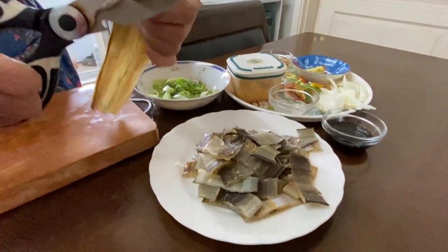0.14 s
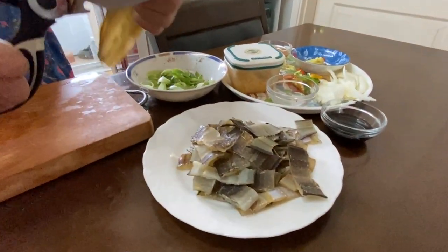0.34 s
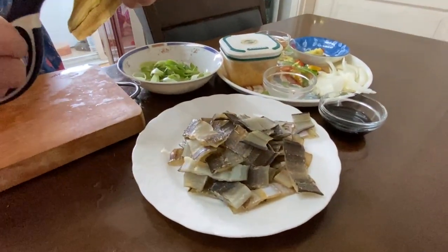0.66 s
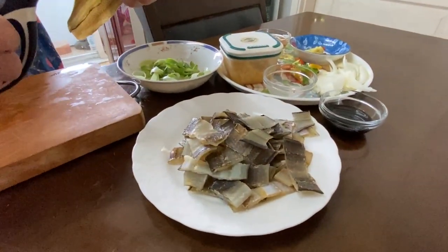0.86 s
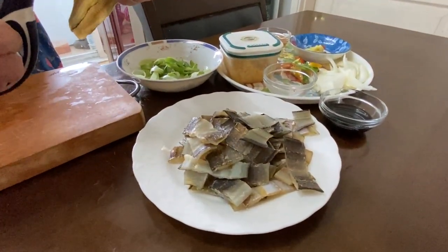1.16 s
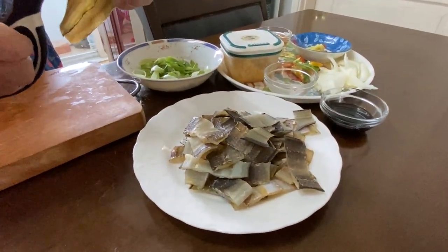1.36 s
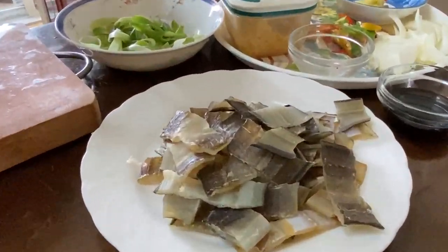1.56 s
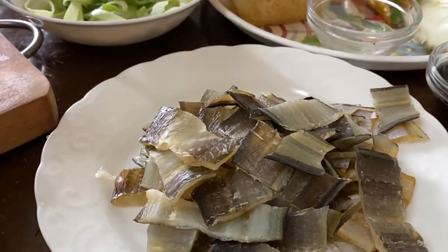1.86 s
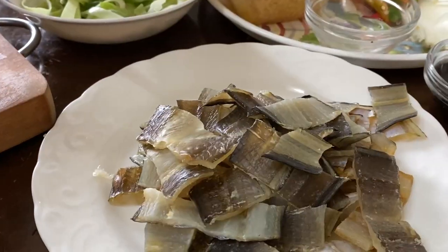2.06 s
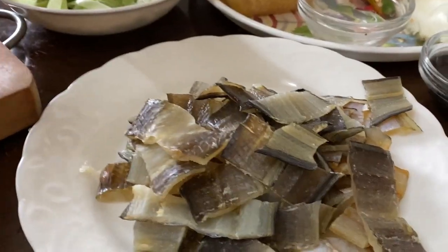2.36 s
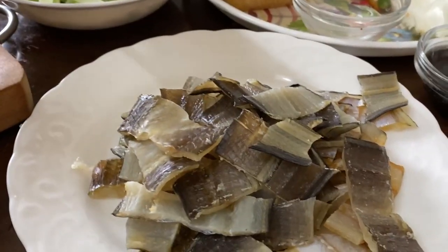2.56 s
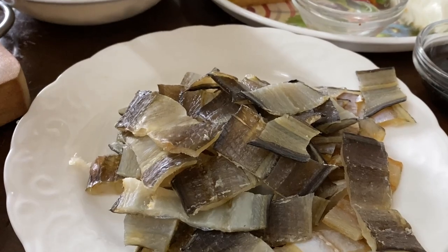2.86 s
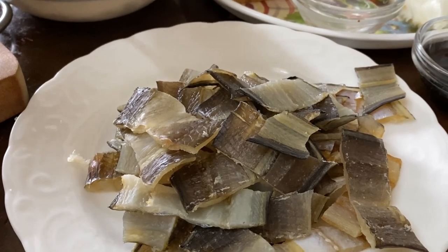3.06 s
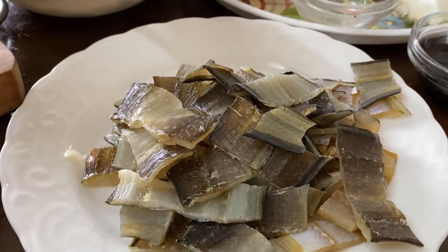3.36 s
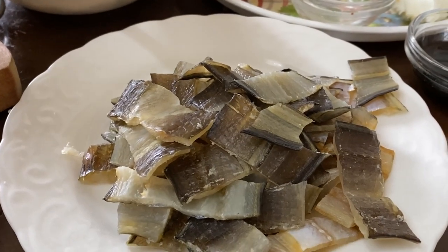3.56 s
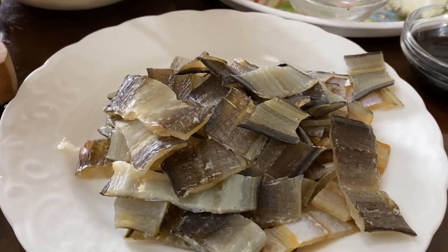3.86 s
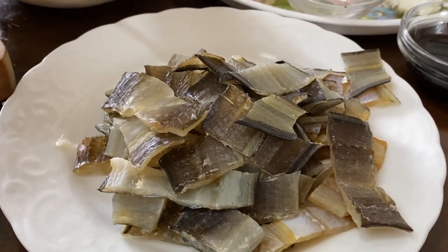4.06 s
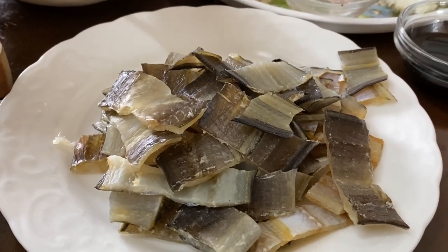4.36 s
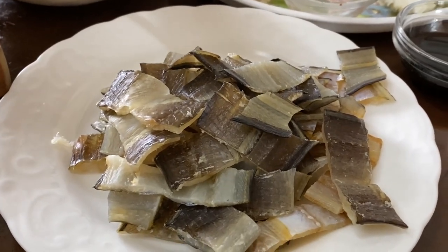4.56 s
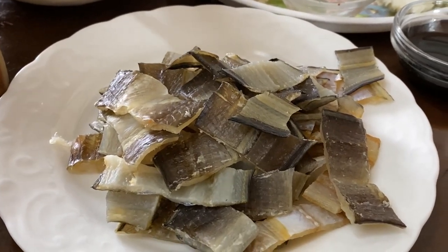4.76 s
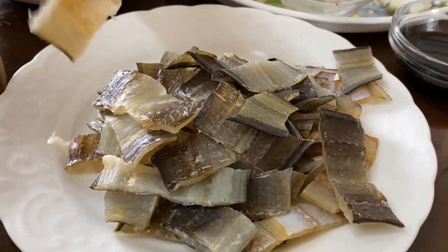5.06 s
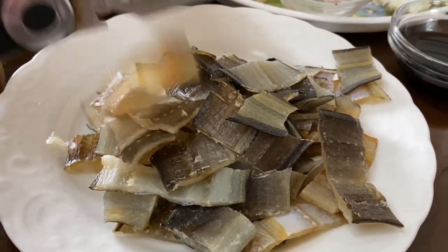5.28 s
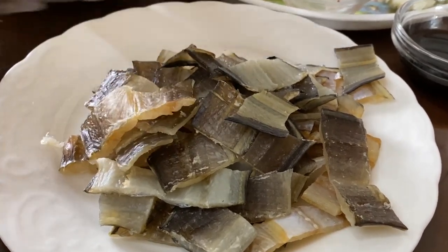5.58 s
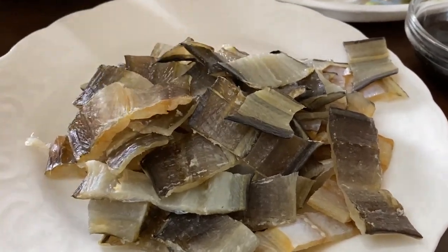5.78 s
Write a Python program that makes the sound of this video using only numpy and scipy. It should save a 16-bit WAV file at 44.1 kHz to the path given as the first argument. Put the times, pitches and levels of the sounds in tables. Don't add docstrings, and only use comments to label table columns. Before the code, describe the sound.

After dull handling bumps, scissor blades tick, squeal and crunch through stiff dried fish, woody board knocks ringing briefly in a hard-walled kitchen.

```python
import sys
import numpy as np
from scipy import signal
from scipy.fft import rfft, irfft
from scipy.io import wavfile

SR = 44100
rng = np.random.default_rng(int(sys.argv[2]) if len(sys.argv) > 2 else 0)


def dump(signal):
    limited = np.clip(np.atleast_2d(signal).T, -1, 1)
    pcm = np.round(limited * 32767).astype(np.int16)
    wavfile.write(sys.argv[1], SR, pcm)


def level_to_linear(level):
    exponent = np.asarray(level, float) / 20
    return 10 ** exponent


N = 261365
TIME = np.arange(N) / SR
STEEL_EDGES_HZ = (1500, 4000, 10000, 16200)
# mode_hz, level_db, t60_s
BOARD_MODES = [(708, -8.5, 0.093), (839, 4, 0.024), (973, 11, 0.025), (1059, 9.5, 0.026),
               (1132, -8.5, 0.056), (1260, -63.5, 0.016), (1630, -39, 0.048)]


def rms_one(x):
    return x / np.sqrt(np.mean(x ** 2) + 1e-20)


def top_one(x):
    return x / (np.max(np.abs(x), axis=-1, keepdims=True) + 1e-12)


def at_hz(points, hz):
    points_hz, points_db = np.transpose(points)
    return np.interp(np.log(hz), np.log(points_hz), points_db)


def band(x, low_hz, high_hz, order=2):
    edges_hz = [low_hz, min(high_hz, 0.45 * SR)]
    return signal.sosfilt(signal.butter(order, edges_hz, "band", fs=SR, output="sos"), x)


def coloured(points, size=N):
    hz = np.maximum(np.arange(size // 2 + 1) * SR / size, 1)
    spectrum = rfft(rng.standard_normal(size)) * level_to_linear(at_hz(points, hz))
    return rms_one(irfft(spectrum, size))


def ring(x, hz, t60_s):
    r = level_to_linear(-60 / (t60_s * SR))
    w = 2 * np.pi * hz / SR
    return signal.lfilter([0, np.sin(w)], [1, -2 * r * np.cos(w), r * r], x)


def add(track, start_s, piece):
    at = round(start_s * SR)
    track[at:at + len(piece)] += piece[:N - at]


def stroke(points_s, points_db):
    first_s, last_s = points_s[0], points_s[-1]
    gate = np.interp(TIME, [first_s - 0.02, first_s, last_s, last_s + 0.02], [0, 1, 1, 0])
    return gate * level_to_linear(np.interp(TIME, points_s, points_db))


def background():
    # freq_hz, density_db
    air = [(53, -13.5), (90, -16.5), (125, -7), (272, -9), (323, -9), (510, -20), (568, -16), (633, -23.5),
           (690, -19), (896, -13.5), (1140, -23), (2090, -37), (5300, -44.5), (12100, -57), (16000, -68)]
    # centre_hz, width_hz, level_db
    whirr = [(329, 2.9, -65), (401.3, 21, -66.5)]
    # tone_hz, level_db
    tones = [(570.8, -64.5), (694.4, -69)]
    out = level_to_linear(-57) * coloured([(60, -60), *air])
    for hz, width_hz, db in whirr:
        t60_s = np.log(1000) / np.pi / width_hz
        out += level_to_linear(db) * rms_one(ring(rng.standard_normal(N), hz, t60_s))
    for hz, db in tones:
        unsteady = rms_one(ring(rng.standard_normal(N), hz, 0.99))
        out += level_to_linear(db) * (np.sin(2 * np.pi * hz * TIME) + 0.22 * unsteady)
    return out


def rumble():
    # freq_hz, density_db
    sway = [(3, -14.5), (9, 5), (25, 0), (45, -25.5), (100, -73), (400, -150)]
    # freq_hz, density_db
    tremor = [(15, -31.5), (32, -3), (75, -11), (100, -38.5), (300, -75.5), (800, -150)]
    # time_s, tremor_db
    grip = [(0, -49), (.2, -56), (.45, -40.5), (.8, -49.5), (1.2, -55.5), (1.6, -44), (2.5, -40.5),
            (3.3, -38.5), (4.3, -48.5), (5.4, -47), (5.93, -49.5)]
    tremor_db = np.interp(TIME, *np.transpose(grip))
    return level_to_linear(tremor_db + 7) * coloured(sway) + level_to_linear(tremor_db) * coloured(tremor)


def jolts():
    # centre_s, level_db, contact_s, mount_hz
    pushes = [(0.071, -23, 0.076, 9), (0.258, -11, 0.017, 15.4), (.5, -10.5, 0.011, 40),
              (0.719, -12, 0.017, 19.5), (0.975, -18.5, 0.016, 33), (1.008, -16, 0.051, 26.7),
              (1.309, -12, 0.019, 16.4), (2.244, -2, 0.019, 5.23), (4.738, -21.5, 0.019, 18.4),
              (5.236, -18, 0.021, 34), (5.536, -18, 0.017, 78)]
    # centre_s, level_db, contact_s, mount_hz
    pulls = [
        (0.463, -9.5, 0.022, 2.6),
        (.491, -13.5, 0.01, 26),
        (.698, -4.5, 0.019, 4.8),
        (1.797, -13.5, 0.02, 21),
        (2.48, -10, 0.028, 16),
        (3.47, -18.5, 0.013, 16),
        (4.591, -17, 0.025, 12),
    ]
    out, t = np.zeros(N), TIME[:SR // 2]
    for rows, sign, damping in ((pushes, 1, 0.21), (pulls, -1, 0.69)):
        for centre_s, db, contact_s, mount_hz in rows:
            push = sign * level_to_linear(db) * np.sin(np.pi * np.clip(t / contact_s, 0, 1)) ** 2
            w = 2 * np.pi * mount_hz
            b, a = signal.bilinear([1, w * damping, 0], [1, 2 * w * damping, w * w], SR)
            add(out, centre_s - contact_s / 2, signal.lfilter(b, a, push))
    return out


def thuds():
    # start_s, level_db, t60_s
    hits = [(0.256, -30, 0.091), (0.45, -32.5, 0.11), (0.487, -30, 0.13), (0.501, -38, 0.13),
            (0.689, -25, 0.058), (0.968, -35.5, 0.19), (0.993, -33, 0.1), (1.305, -28.5, 0.06),
            (1.821, -36.5, 0.15), (2.238, -34, 0.24), (2.28, -42, 0.1), (2.437, -33.5, 0.041),
            (2.701, -38, 0.26), (3.447, -31.5, 0.14), (4.574, -37.5, 0.056), (4.717, -35, 0.061),
            (5.532, -42, 0.11)]
    low_hz, upper_hz, upper_db = 180, 306.2, -6.5
    contact_s, detune = 0.00093, 0.061
    out, t = np.zeros(N), TIME[:SR // 4]
    touch = np.sin(np.pi * np.clip(t / contact_s, 0, 1))
    for start_s, db, t60_s in hits:
        low_draw, upper_draw = rng.standard_normal(2)
        low = top_one(ring(touch, low_hz * (1 + detune * low_draw), t60_s))
        upper = top_one(ring(touch, upper_hz * (1 + detune * upper_draw), t60_s))
        add(out, start_s, level_to_linear(db) * (low + level_to_linear(upper_db) * upper))
    return out


def kitchen(x):
    # freq_hz, t60_s
    room_t60 = [(200, 0.4), (530, 0.25), (1390, 0.46), (3000, 0.53), (5000, 0.36), (7000, .32),
                (10000, 0.1), (14000, 0.24)]
    # freq_hz, level_db
    room_colour = [(200, 13), (500, 16), (1000, 11), (1600, 9.5), (3000, -1.5), (4800, 3.5), (7000, 5),
                   (14000, 4.5)]
    t, tail = TIME[:SR * 3 // 4], 0
    for hz in 177 * 2 ** np.arange(0, 6.7, 1 / 3):
        noise = band(rng.standard_normal(len(t)), hz / 2 ** 0.27, hz * 2 ** 0.24)
        tail = tail + noise * level_to_linear(at_hz(room_colour, hz) - 60 * t / at_hz(room_t60, hz))
    tail *= np.clip((t - 0.002) / 0.0016, 0, 1)
    return signal.fftconvolve(x, tail / np.sqrt(np.sum(tail ** 2)))[:N]


def chatter():
    catches = (rng.random(N) < 160 / SR) * rng.exponential(1, N)
    grains = 1 + 0.8 * signal.lfilter([1], [1, -0.992], catches)
    stick_slip = rms_one(band(rng.standard_normal(N), 9.8, 53))
    return rms_one(grains * level_to_linear(0.5 * stick_slip))


def friction_hiss():
    # start_s, hardest_s, end_s, hiss_db
    strokes = [(1.516, 1.645, 1.97, -68.5), (1.904, 2.03, 2.5, -73), (2.71, 2.726, 2.93, -66),
               (2.78, 2.864, 3.1, -74.5), (3.538, 3.637, 3.84, -59), (4.02, 4.13, 4.46, -71),
               (4.602, 4.64, 4.62, -67.5), (4.69, 4.742, 4.98, -58.5), (4.775, 4.87, 4.89, -78),
               (5.18, 5.245, 5.36, -53.5), (5.37, 5.39, 5.6, -71.5)]
    # freq_hz, density_db
    colour = [(1200, -20), (2200, 16.5), (3000, 11.5), (4000, 0.5), (5500, 13), (8000, 7), (14500, -4.5),
              (16500, -6)]
    rise_db, fall_db = 16.5, 20.5
    gain = sum(stroke([start_s, hardest_s, end_s], [db - rise_db, db, db - fall_db])
               for start_s, hardest_s, end_s, db in strokes)
    return coloured(colour) * gain


def squeals():
    # start_s, end_s, first_hz, last_hz, level_db
    glides = [(1.546, 1.685, 8600, 10400, -72), (1.922, 2.073, 5040, 7500, -56.5),
              (2.707, 2.771, 5200, 5500, -53.5), (2.793, 2.94, 7140, 8400, -77),
              (3.504, 3.578, 8200, 8700, -72), (3.563, 3.688, 9230, 10400, -55.5),
              (3.64, 3.741, 12000, 12800, -64), (4.017, 4.202, 5200, 9100, -55),
              (4.15, 4.253, 7500, 6884, -70), (4.682, 4.796, 8900, 12360, -55),
              (4.724, 4.882, 13150, 14400, -62.5)]
    peak_share, rise_db, fall_db = 0.74, 13.5, 21.5
    wobble = rng.standard_normal((2, N))
    low_pass = signal.butter(1, 450, fs=SR, output="sos")
    narrow = signal.sosfilt(low_pass, wobble[0] + 1j * wobble[1])
    narrow = narrow / np.sqrt(np.mean(np.abs(narrow) ** 2) / 2)
    out = np.zeros(N)
    for start_s, end_s, first_hz, last_hz, db in glides:
        peak_s = start_s + peak_share * (end_s - start_s)
        gain = stroke([start_s, peak_s, end_s], [db - rise_db, db, db - fall_db])
        on = gain > 0
        hz = np.interp(TIME[on], [start_s, end_s], [first_hz, last_hz])
        carrier = np.exp(2j * np.pi * np.cumsum(hz) / SR)
        out[on] += gain[on] * np.real(narrow[on] * carrier)
    return out


def slides():
    return (friction_hiss() + squeals()) * chatter()


def blade_rings():
    # mode_hz, level_db, t60_s
    modes = [(7140, -8, .23), (6900, -2.5, 0.23), (6800, -6, 0.23), (6700, -11, 0.18)]
    # start_s, ring_db, clack_db, clack_hz
    claps = [
        (3.171, -52, -28.5, 6800),
        (4.179, -89, -40.5, 7430),
        (4.362, -92, -56, 7630),
    ]
    clicks, clacks = np.zeros(N) + 1e-18, np.zeros(N)
    click = 1.0 * (TIME[:SR // 50] == 0)
    for start_s, ring_db, clack_db, hz in claps:
        clicks[round(start_s * SR)] = level_to_linear(ring_db)
        add(clacks, start_s, level_to_linear(clack_db) * top_one(band(click, 0.96 * hz, 1.05 * hz, order=3)))
    rings = sum(level_to_linear(db) * ring(clicks, hz, t60_s) for hz, db, t60_s in modes)
    return rings, clacks


def steel_bands(drive):
    return [top_one(band(drive, low_hz, high_hz, order=3))
            for low_hz, high_hz in zip(STEEL_EDGES_HZ, STEEL_EDGES_HZ[1:])]


def ticks():
    # start_s, peak_db, ring_hz, top_db re peak
    clear = [(0.9924, -44, 5800, -35), (1.661, -41, 10500, -21), (1.927, -42, 4100, -25),
             (1.971, -40, 6100, -4), (1.9782, -31, 5130, -12), (2.019, -25.5, 6830, -28),
             (2.0329, -32, 6800, -21), (2.0506, -32, 7500, -16.5), (2.063, -28.5, 6000, -35),
             (2.282, -46, 3920, -9.5), (2.4218, -45, 5470, -12), (2.735, -40, 5700, -13),
             (2.7453, -42.5, 5300, -2), (2.866, -36.5, 8070, -11), (2.928, -45.5, 5950, -24),
             (3.171, -20, 6600, -20), (3.6316, -35, 10600, -15), (3.6528, -36, 10400, -17),
             (4.0228, -38.5, 5390, -16), (4.062, -40.5, 6620, -19), (4.0923, -34.5, 7710, -10),
             (4.099, -60, 7750, -28), (4.123, -32, 8560, -23), (4.1354, -32.5, 8250, -12),
             (4.1789, -34, 7100, -8), (4.363, -40, 7440, -28), (5.2082, -31.5, 7980, -4.5),
             (5.878, -34, 5326, -20), (3.1717, -30, 2520, -30), (4.6713, -52, 3980, -19)]
    # start_s, peak_db
    pivot = [(0.925, -48), (0.9823, -59), (1.5199, -47.5), (1.552, -50), (1.5674, -49), (1.624, -51),
             (1.701, -60), (2.1902, -48), (2.3213, -48), (2.815, -41), (2.8365, -43), (2.9427, -46),
             (3.081, -48), (3.0893, -50), (3.5797, -54), (3.6787, -42), (3.845, -46.5), (4.014, -47),
             (4.313, -49), (4.597, -51), (4.6148, -41), (4.6474, -43.5), (4.704, -51), (4.7694, -40),
             (4.988, -50), (5.013, -50), (5.192, -48), (5.382, -60), (5.3935, -46), (5.583, -39)]
    pivot_hz, pivot_top_db, pivot_ring_db = 5500, -23.5, -10
    burst_t60_s = 0.0096
    rows = [(*row, 0) for row in clear]
    rows += [(start_s, db, pivot_hz, pivot_top_db, pivot_ring_db) for start_s, db in pivot]
    direct, sent, t = np.zeros(N), np.zeros(N), TIME[:SR // 30]
    bursts = rng.standard_normal((len(rows), len(t))) * level_to_linear(-60 * t / burst_t60_s)
    click = 1.0 * (t == 0)
    even_dull, even_mid, _ = steel_bands(click)
    for row, burst, dull, mid, top in zip(rows, bursts, *steel_bands(bursts)):
        start_s, db, hz, top_db, ring_db = row
        dull_db = -10.5 - 0.15 * (db + 46.5)
        ringing, even_ring = level_to_linear(ring_db) * top_one(band([burst, click], 0.929 * hz, 1.023 * hz))
        tick = 0.44 * mid + 0.44 * ringing + level_to_linear(dull_db) * dull + level_to_linear(top_db) * top
        even_tick = even_mid + 0.12 * even_ring + level_to_linear(dull_db) * even_dull
        add(direct, start_s, level_to_linear(db) * tick)
        add(sent, start_s, level_to_linear(db) * even_tick)
    return direct, sent


def snap_shape(drive, mode_db, board_db, edge_db, order):
    low_hz, mid_hz, high_hz = 1250, 4300, 8500
    crack = top_one(band(signal.lfilter([1], [1, -0.7], drive), low_hz, mid_hz, order=order))
    wood = sum(level_to_linear(db + extra_db) * ring(drive, hz, t60_s)
               for (hz, db, t60_s), extra_db in zip(BOARD_MODES, mode_db))
    wood = top_one(wood) + level_to_linear(-28.5) * top_one(band(drive, 170, 800))
    edge = band(drive, mid_hz, high_hz) - level_to_linear(-19) * band(drive, *STEEL_EDGES_HZ[2:])
    return crack + level_to_linear(board_db) * top_one(wood) - level_to_linear(edge_db) * top_one(edge)


def snaps():
    # start_s, crack_db, board_db re crack, edge_db re crack, decay_s
    fish = [(1.7938, -26.5, 1.5, -19.5, 0.089), (1.94, -36.5, 0, -22, 0.013),
            (2.0111, -25.5, -1.5, -26, 0.027), (2.2407, -39, 4.5, -25, 0.019),
            (2.2762, -32.5, 0, -26, 0.028), (2.614, -28.5, -2, -44, 0.024), (2.66, -21, -1.5, -19.5, 0.073),
            (3.352, -17, -7, -52, 0.014), (3.4023, -18.5, -6, -19.5, 0.013), (3.4274, -22, 1.5, -15, 0.05),
            (3.9414, -26, -3, -57, 0.028), (5.5191, -18.5, -0.5, -21.5, 0.0081)]
    # start_s, crack_db, board_db re crack
    crumbs = [
        (0.9662, -46.5, 6.5),
        (5.2285, -42.5, 8),
        (5.2359, -35.5, -7),
        (5.2474, -48, 9),
    ]
    # start_s, crack_db, board_db re crack
    taps = [(0.2567, -43.5, 8), (0.4495, -71.5, 27.5), (0.4892, -45.5, 10.5), (0.4983, -54, 22),
            (0.5087, -44.5, 11), (0.5566, -60, 2), (0.6851, -60.5, 25.5), (0.701, -48.5, 8),
            (0.7258, -55.5, 5), (0.9925, -45.5, -3), (1.0035, -64.5, 26), (1.3045, -46.5, 20.5),
            (2.4348, -52, 5)]
    # edge_db, decay_s, room_db appended per kind
    rows = [(*row, -16.5) for row in fish]
    rows += [(*row, 1, 0.045, -34.5) for row in crumbs]
    rows += [(*row, -27, 0.019, -40) for row in taps]
    skin_low_hz, skin_high_hz, skin_t60_s, skin_db = 1300, 5200, 0.022, -12
    direct, sent, t = np.zeros(N), np.zeros(N), TIME[:SR // 10]
    click = 1.0 * (t == 0)
    for start_s, crack_db, board_db, edge_db, decay_s, room_db in rows:
        noise, clumps = rng.standard_normal((2, len(t)))
        spray = noise * level_to_linear(5.94 * clumps - 60 * t / decay_s)
        spray[0] = 7.8
        skin_hz = skin_low_hz * (skin_high_hz / skin_low_hz) ** ((np.arange(5) + rng.random(5)) / 5)
        skin = level_to_linear(skin_db) * top_one(sum(ring(spray, hz, skin_t60_s) for hz in skin_hz))
        mode_db = 3 * rng.standard_normal(len(BOARD_MODES))
        snap = snap_shape(spray, mode_db, board_db + 0.6, edge_db, order=4)
        even_snap = snap_shape(click, 0 * mode_db, board_db - 0.5, edge_db + 7.5, order=2)
        add(direct, start_s, level_to_linear(crack_db - 0.6) * (skin + snap))
        add(sent, start_s, level_to_linear(crack_db + room_db) * even_snap)
    return direct, sent


def scene():
    fish, fish_sent = snaps()
    steel, steel_sent = ticks()
    rings, clacks = blade_rings()
    hiss = slides()
    sent = level_to_linear(16) * fish_sent + level_to_linear(-6) * (steel_sent + rings) + clacks + level_to_linear(-18.5) * hiss
    near = fish + steel + rings + hiss
    return (near + kitchen(sent) + thuds() + jolts() + rumble() + background())[None]


def roll_off(x):
    return signal.sosfilt(signal.butter(12, 16610, fs=SR, output="sos"), x)


def record(dry):
    limit = np.where(dry > 0, 0.66, 0.5)
    flattened = dry / (1 + (dry / limit) ** 8) ** (1 / 8)
    rolled = signal.sosfilt(signal.cheby2(8, 30, 16600, fs=SR, output="sos"), flattened)
    return roll_off(rolled)


dry = scene()
out = record(dry)
dump(out)
```